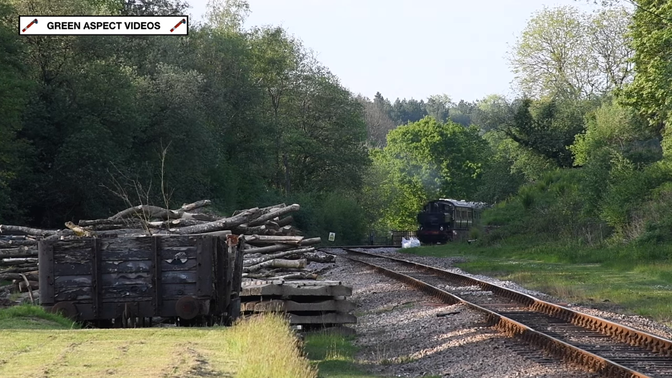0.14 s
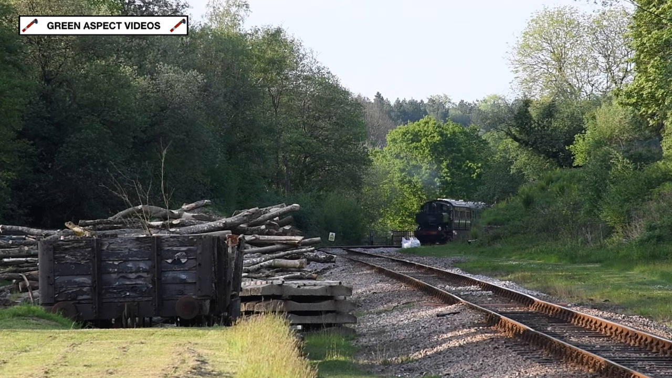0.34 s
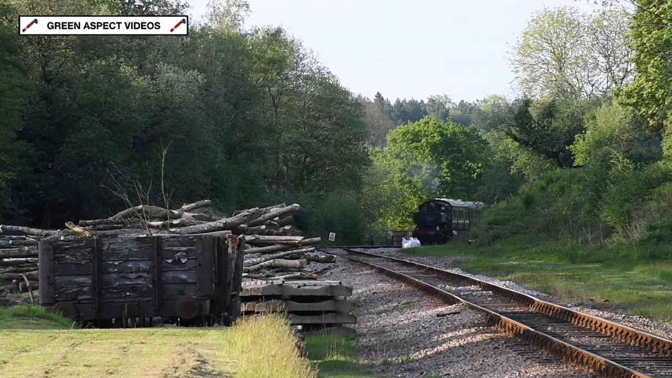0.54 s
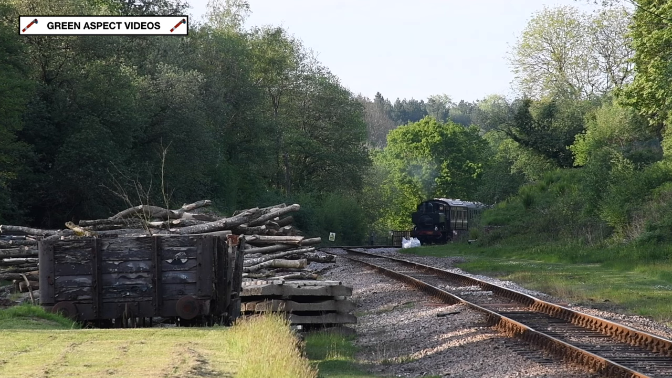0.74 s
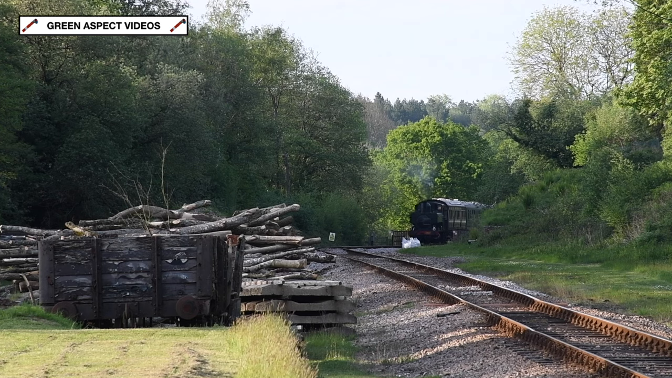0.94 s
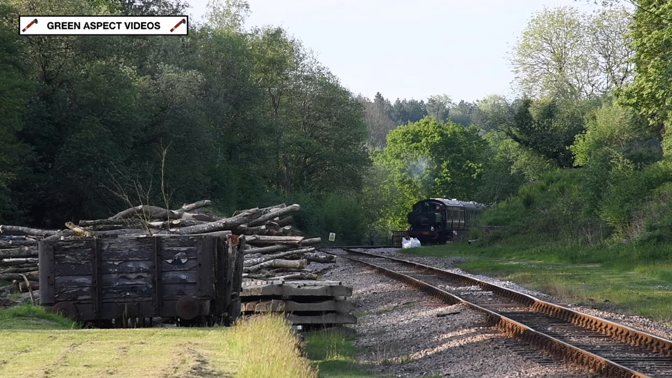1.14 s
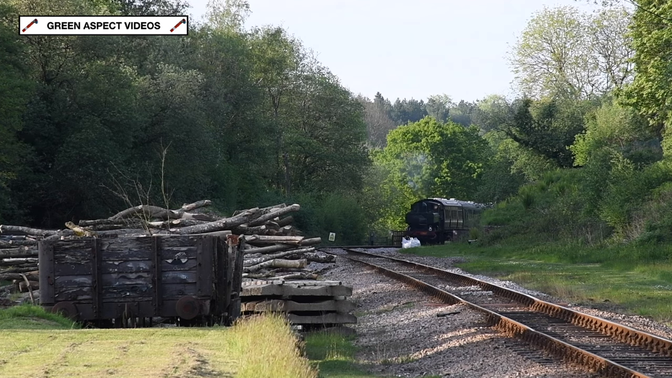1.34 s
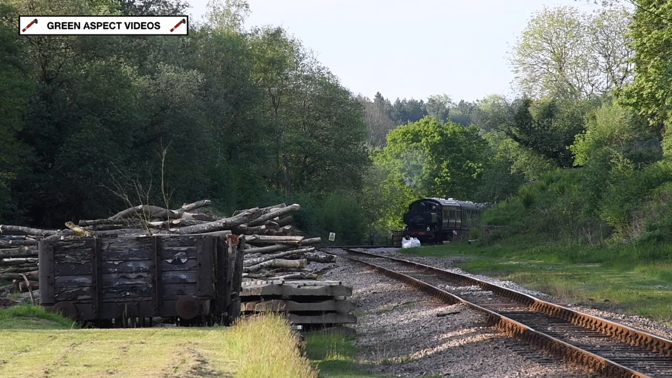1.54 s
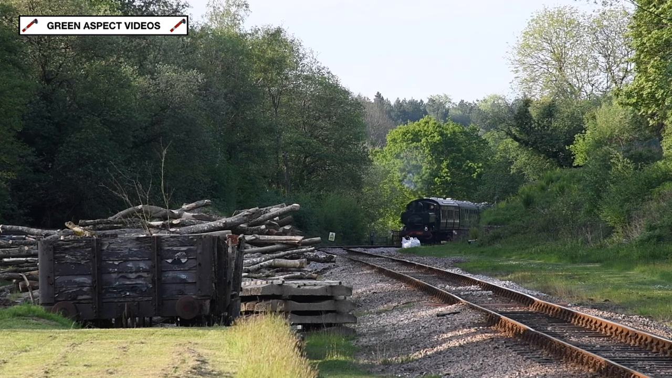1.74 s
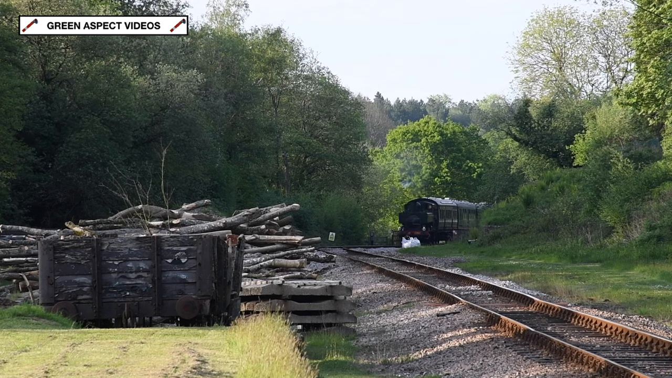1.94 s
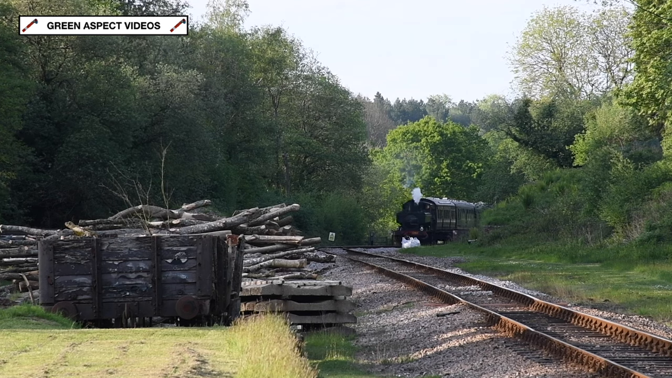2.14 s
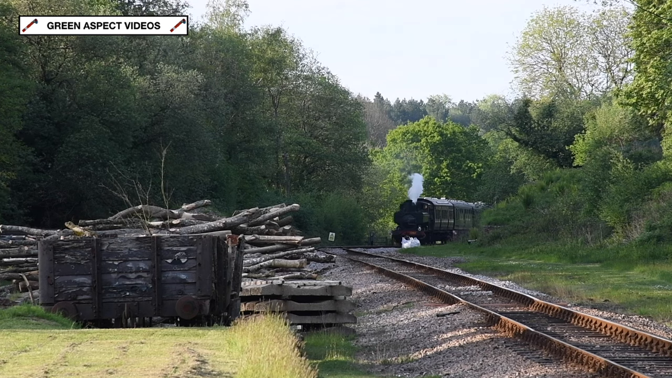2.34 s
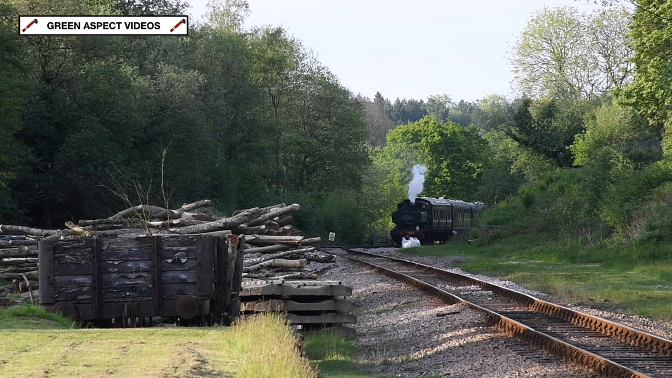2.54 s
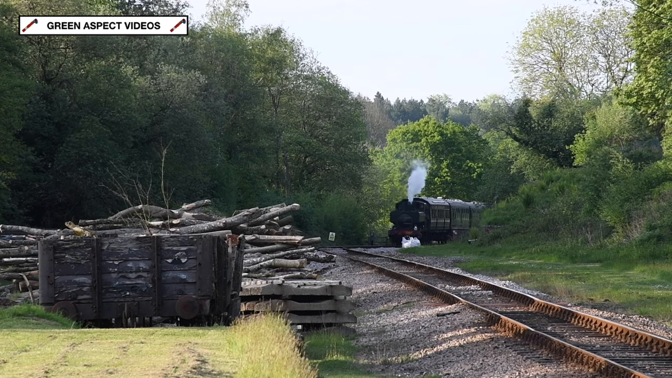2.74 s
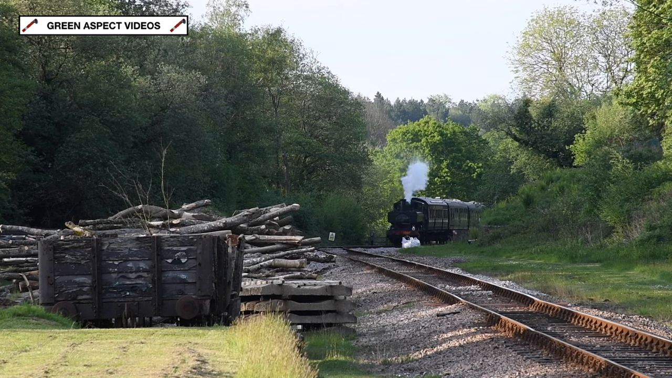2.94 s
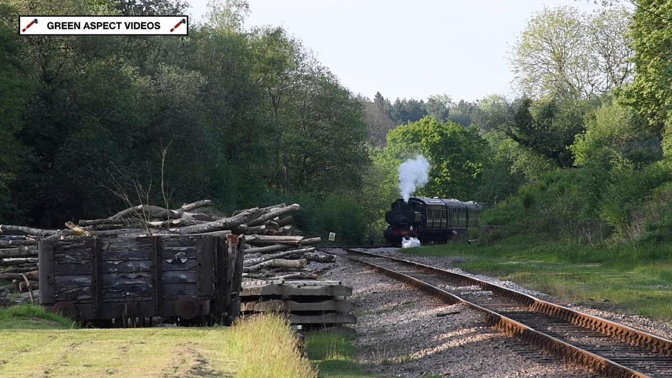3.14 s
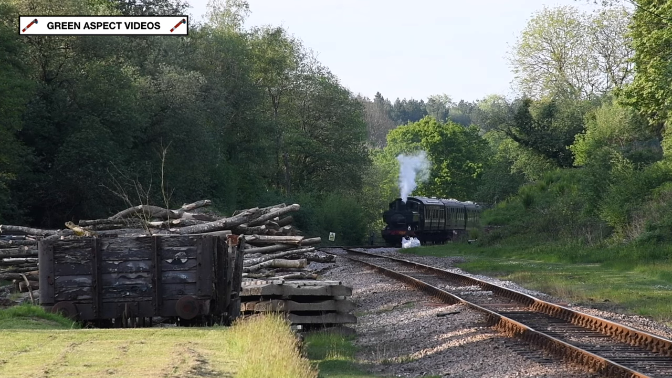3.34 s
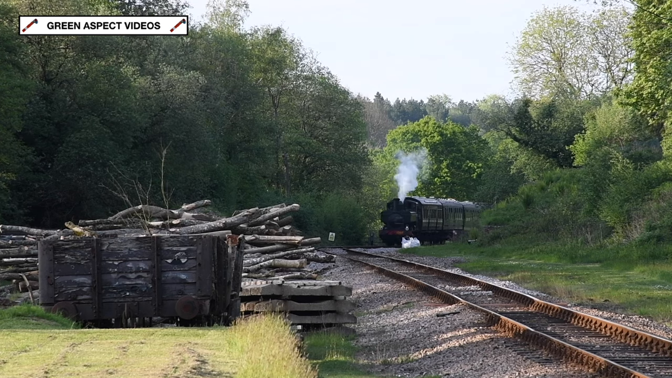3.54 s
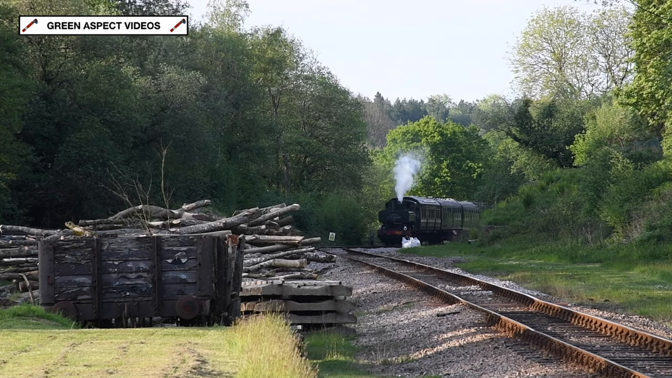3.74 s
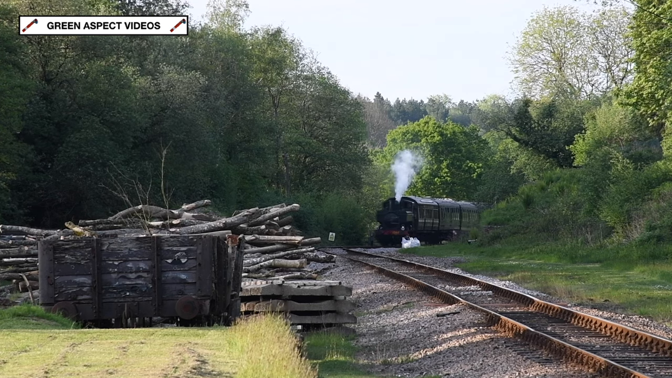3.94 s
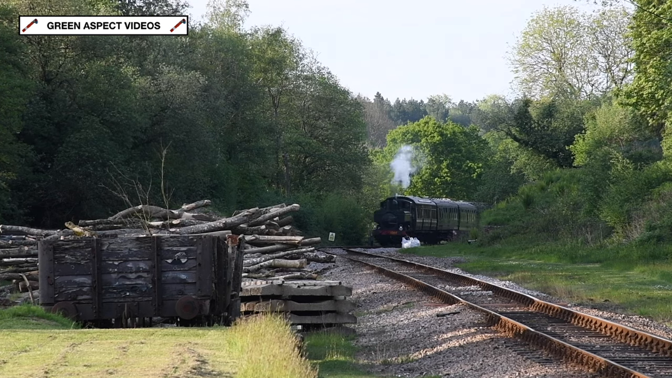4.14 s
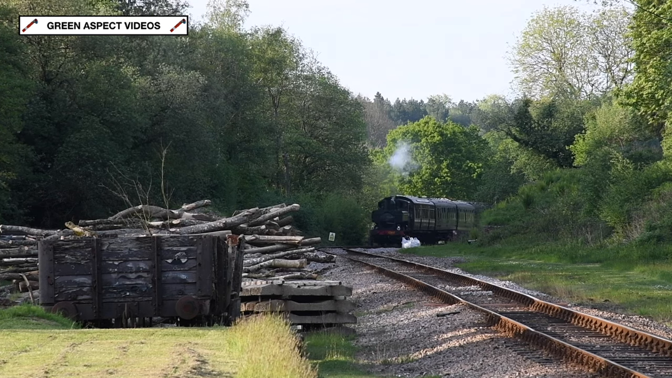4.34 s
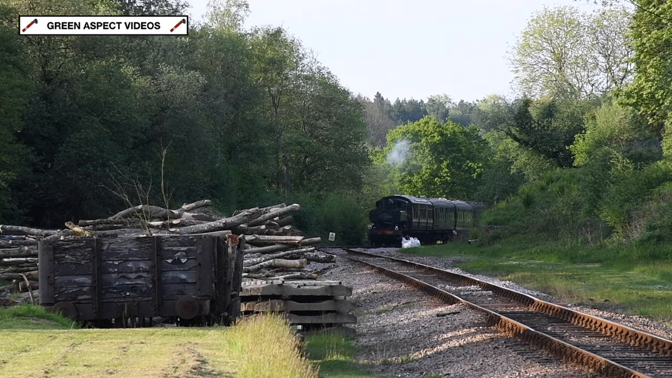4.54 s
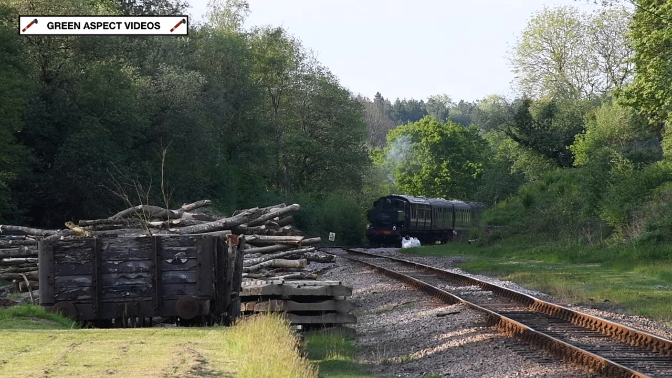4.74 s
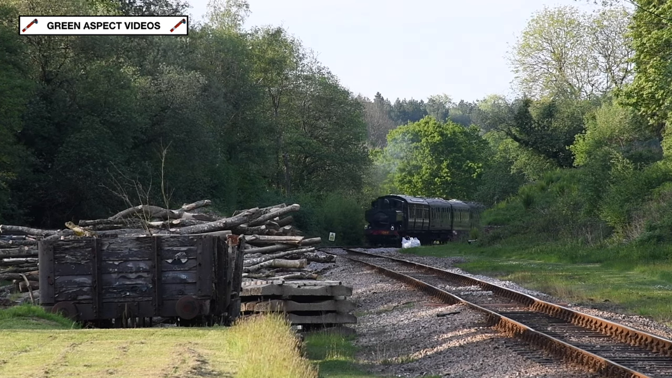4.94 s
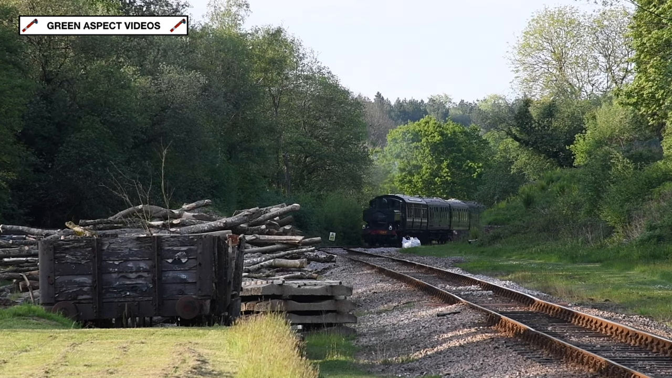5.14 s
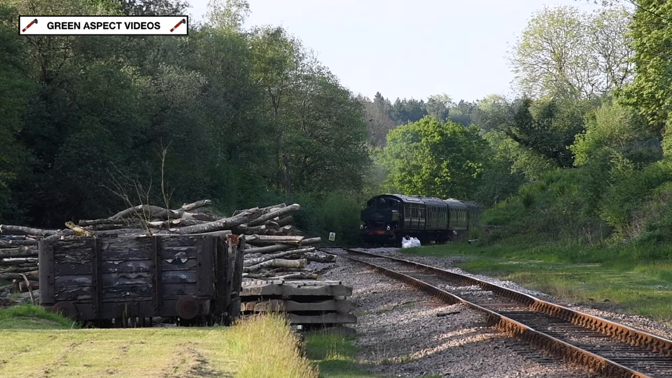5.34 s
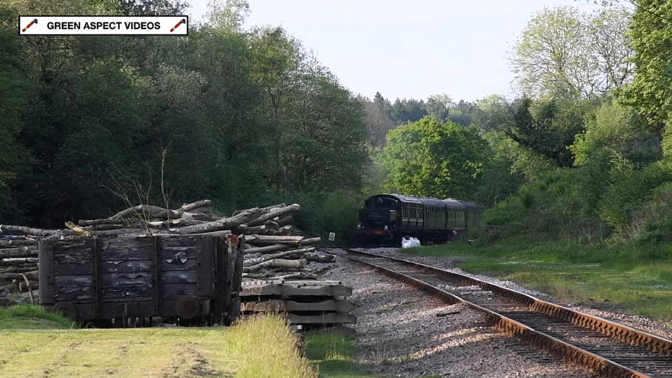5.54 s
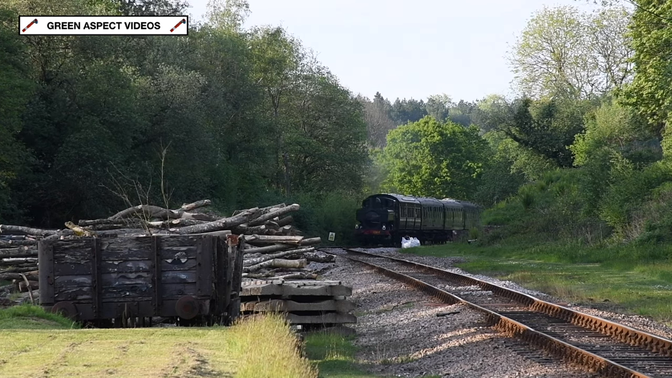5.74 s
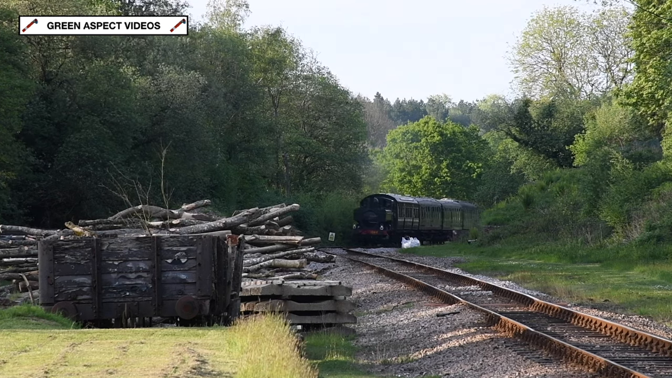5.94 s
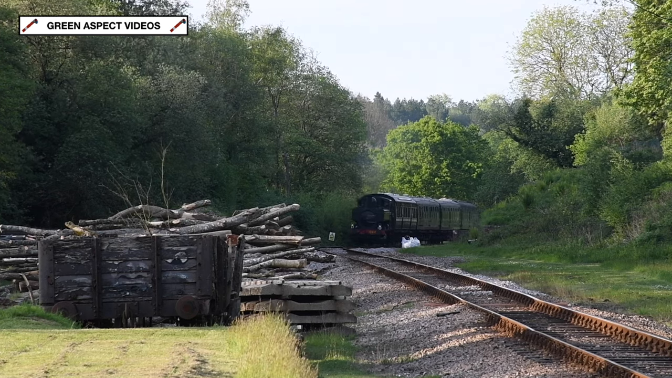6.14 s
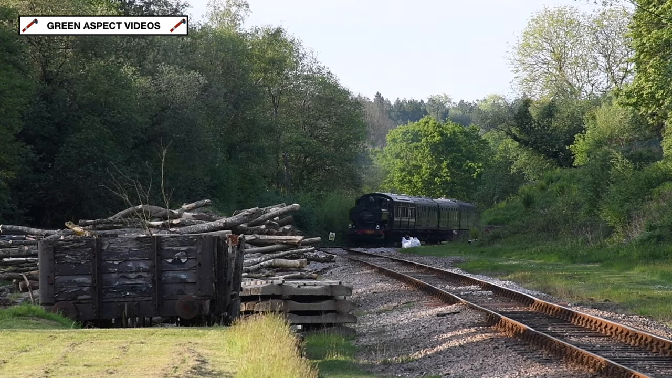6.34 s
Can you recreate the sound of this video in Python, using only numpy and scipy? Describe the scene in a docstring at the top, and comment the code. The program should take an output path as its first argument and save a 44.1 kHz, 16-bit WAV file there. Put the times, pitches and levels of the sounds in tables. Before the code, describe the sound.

Heard from far down the line, an approaching train makes a quiet, throbbing rumble beneath a few faint chirps and twitters. Then its steam whistle sounds once, much louder, for about two seconds: a hissing, fluttering tone that slides upward and jumps for a moment to a shrill pitch. After it stops, a long echo dies away among the trees, leaving the low rumble and a light rush from the rails.

```python
"""The low rumble of an approaching train and a few small birds fill a wooded cutting.
Then the distant steam locomotive gives one two-second blast on its whistle. A steam jet drives the bell:
the breathy note climbs as the bell heats and briefly overblows to its upper mode.
The woods throw it back in a long echo."""
import sys
import numpy as np
from scipy import signal
from scipy.fft import rfft, irfft, next_fast_len
from scipy.io import wavfile
from scipy.ndimage import map_coordinates

SR = 44100
rng = np.random.default_rng(int(sys.argv[2]) if len(sys.argv) > 2 else 0)


def output_pcm(signal):
    """Save a mono or channel-first signal as 16-bit PCM at the path in sys.argv[1].

    Samples are clipped to [-1, 1] before scaling.
    """
    pcm = np.clip(np.atleast_2d(signal).T, -1, 1) * 32767
    wavfile.write(sys.argv[1], SR, np.round(pcm).astype(np.int16))


N = 285961
TIME = np.arange(N) / SR

OPEN_S, SHUT_S = 2.957, 4.821   # the steam valve
COLD_HZ, HOT_HZ, HEAT_S = 797.7, 870.6, .41   # the note climbs as steam fills and heats the bell
# Tone colour of the train and the open air. Each row: frequency in Hz, relative level in dB.
AIR_SPECTRUM = [(15, -49.5), (25, -29.5), (52, -10), (75, 0.5), (188, -11.5), (368, -8.5), (410, -10.5),
                (509, -9), (648, -14.5), (970, -12), (1620, -16), (2420, -20), (3170, -25.5), (3720, -25),
                (15500, -43.5)]
# Surges of the train's noise. Each row: peak time in seconds, rumble gain in dB, wheel gain in dB.
TRAIN_SURGES = [(.2, -58, -63), (.41, -53, -69), (.59, -49, -49.5), (.85, -63, -54), (.95, -64, -53),
                (1.12, -59, -66), (1.245, -60, -58), (1.33, -52, -49), (1.53, -65, -52), (2.11, -48, -75),
                (2.45, -50, -58), (2.88, -61, -52), (5.271, -48.5, -70), (5.47, -48, -53)]


def from_db(db):
    """Decibels to gain."""
    return 10 ** (np.asarray(db) / 20)


def rms_one(x):
    """Scale to unit power."""
    return x / np.sqrt(np.mean(x ** 2) + 1e-20)


def in_time(points):
    """Read an envelope at every sample."""
    return np.interp(TIME, *np.transpose(points))


def at_hz(points, hz):
    """Read a spectrum on a log-frequency axis."""
    known, values = np.transpose(points)
    return np.interp(np.log(hz + 1), np.log(known), values)


def noise(gain_at, size=N):
    """Unit-power noise, coloured by the given function of frequency."""
    padded = next_fast_len(size)
    hz = np.fft.rfftfreq(padded, 1 / SR)
    spectrum = rfft(rng.standard_normal(padded)) * gain_at(hz)
    return rms_one(irfft(spectrum, padded)[:size])


def drift(rate_hz):
    """Random wandering of unit power, up to about the given rate."""
    return noise(lambda hz: 1 / (1 + (hz / rate_hz) ** 2))


def swells(rows):
    """Smooth bumps of gain. Each row: peak time in seconds, half length in seconds, peak in dB."""
    power = sum(from_db(db) ** 2 * np.exp(-2 * ((TIME - s) / half_s) ** 2) for s, half_s, db in rows)
    return np.sqrt(power + 1e-20)


def engine_rumble(level_db, throb_db, top_hz):
    """The engine's low rumble throbs and now and then surges."""
    rumble = noise(lambda hz: from_db(at_hz(AIR_SPECTRUM, hz)) / np.sqrt(1 + (hz / top_hz) ** 8))
    surges = swells([(s, .022, db) for s, db, _ in TRAIN_SURGES])
    return rumble * np.hypot(from_db(level_db + throb_db * drift(6)), surges)


def open_air(low_hz, top_hz):
    """A steady wash of distant train and open air, above the rumble."""
    def colour(hz):
        low_cut = np.sqrt(1 + (low_hz / (hz + 1)) ** 8)
        return from_db(at_hz(AIR_SPECTRUM, hz)) / low_cut / (1 + (hz / top_hz) ** 4)
    return noise(colour)


def wheels(air, gain_db, fade_db_per_s, uneven_db):
    """Dull wheel noise: surges over an uneven, fading bed."""
    dull = signal.sosfilt(signal.butter(2, 1200, fs=SR, output="sos"), air)
    bed = from_db(gain_db - fade_db_per_s * TIME + uneven_db * drift(18))
    return dull * (bed + swells([(s, .022, db) for s, _, db in TRAIN_SURGES]))


def birds():
    """Gliding sines: one bird's chirps run out into a soft twitter; a second flutes lower notes."""
    # The small bird. Each row: start in seconds, middle pitch in Hz, glide in Hz, level in dB.
    chirps = [(.147, 3900, 698.5, -60), (.338, 4550, 799, -58), (.425, 6420, 151.5, -64),
              (.697, 3400, 503, -58.5), (.792, 3970, 900, -55), (.857, 5490, 2.5, -61.5),
              (1.012, 3720, 596.5, -62), (1.06, 6100, -100, -63), (1.113, 5400, 286, -63)]
    # The second bird. Each row: start and length in seconds, middle pitch and glide in Hz, level in dB.
    fluted = [(.551, 0.22, 2430, -58.5, -61), (1.519, 0.11, 1900, -270, -59),
              (1.69, 0.11, 1975, -350, -53.5), (1.95, .081, 2110, 44, -59), (2.04, .1, 2400, 238, -56.5),
              (2.14, .14, 2527, 60.5, -62)]
    chirp_s, twitter_s, twitter_hz = .028, .022, 3460
    notes = [(s, chirp_s, hz, glide_hz, db) for s, hz, glide_hz, db in chirps]
    beats_s = np.arange(1.19, 1.8, .066)
    for s, (late, high, up, loud) in zip(beats_s, rng.standard_normal(size=(32, 4))):
        hz = twitter_hz + 180 * high
        notes.append((s + .011 * late, twitter_s, hz, 400 * np.sign(up), -61.5 + 2.2 * loud))
    song = np.zeros(N)
    for s, length_s, hz, glide_hz, db in notes + list(fluted):
        progress = np.linspace(0, 1, int(length_s * SR))
        phase = 2 * np.pi * np.cumsum(hz + glide_hz * (progress - .5)) / SR
        at = int(s * SR)
        song[at:at + len(phase)] += from_db(db) * np.sin(np.pi * progress) * np.sin(phase)
    return song


def woods(x):
    """Countless echoes off trunks and banks; the longer the path, the more treble it loses."""
    # Scattering by the trees. Each row: delay in seconds, relative level in dB.
    tail = [(.01, 1.5), (.08, 2), (.17, -1), (.32, -11.5), (.62, -14), (.85, -13.5), (1.18, -27.5),
            (1.5, -22), (2.2, -40), (3.5, -40)]
    # Colour the leaves give the echo. Each row: frequency in Hz, gain in dB.
    leaves = [(300, -6), (600, 6), (860, 1.5), (1700, -4.5), (2600, 1.5), (4200, -0.5), (7000, 3)]
    # Absorption along the path, as a tilt on the tail. Each row: frequency in Hz, gain in dB per second.
    absorption = [(300, -14), (860, 5), (1700, -1), (2600, -15), (3400, -24.5), (4200, -31), (7000, -37.5)]
    scatter = rms_one(rng.standard_normal(N) * from_db(in_time(tail)) * (TIME > .008)) / np.sqrt(N)
    edges_hz = np.geomspace(200, 10000, 11)
    response = np.zeros(N)
    for low, high in zip(edges_hz, edges_hz[1:]):
        band = signal.sosfilt(signal.butter(2, [low, high], "band", fs=SR, output="sos"), scatter)
        hz = np.sqrt(low * high)
        response += band * from_db(at_hz(leaves, hz) + at_hz(absorption, hz) * TIME)
    return signal.fftconvolve(x, response)[:N]


def settling(time_s):
    """Holds at 1 until the valve opens, then decays towards 0."""
    return np.exp(-np.maximum(TIME - OPEN_S, 0) / time_s)


def valve(rise_s, fall_s):
    """The valve swings open; once it shuts the pressure dies away."""
    return (1 - settling(rise_s)) ** 2 * np.exp(-np.maximum(TIME - SHUT_S, 0) / fall_s)


def heating(cold_hz, hot_hz):
    """A mode of the bell rises with its temperature."""
    return hot_hz + (cold_hz - hot_hz) * settling(HEAT_S)


def unsteady_phase(hz, jitter, rate_hz):
    """Phase of a tone whose pitch is shaken by turbulence."""
    return 2 * np.pi * np.cumsum(hz * (1 + jitter * drift(rate_hz))) / SR


def whistle_note(hz, flutter_db, fading_db, bloom_s):
    """The jet locks onto the bell's lowest mode: a fluttering tone whose overtones bloom with pressure."""
    # Strength of the note. Each row: time in seconds, relative level in dB.
    strength = [(2.97, -17.5), (3.15, -18.5), (3.3, -13.5), (3.39, -16.5), (3.46, -10.5), (3.6, -16),
                (3.81, -14), (3.88, -18), (4.02, -15), (4.1, -23), (4.18, -16), (4.27, -25.5),
                (4.36, -18.5), (4.64, -21), (4.76, -17.5), (4.84, -19)]
    # Its overtones. Each row: harmonic number, level in dB against the fundamental at full bloom.
    harmonics = [(2, -27.5), (3, -19), (4, -41.5), (5, -30)]
    phase = unsteady_phase(hz, jitter=.00801, rate_hz=63.3)
    overtones = sum(from_db(db) * np.sin(round(k) * phase) for k, db in harmonics)
    wave = np.sqrt(2) * (np.sin(phase) + overtones * valve(rise_s=bloom_s, fall_s=.05))
    fading = fading_db * np.tanh(drift(30))   # moving air on the long path
    gain = from_db(in_time(strength) + fading + flutter_db * drift(41))
    return wave * gain * valve(rise_s=.012, fall_s=.04)


def overblow(wander, flutter_db, octave_db, twelfth_db):
    """The upper mode is rough while weak; taking over, it steadies, goes flat and gains overtones."""
    # Swells of the upper mode. Each row: peak time and half length in seconds, relative peak in dB.
    squeals = [(3.026, 0.015, -27.5), (3.15, 0.037, -24), (3.21, 0.017, -21), (3.248, 0.022, -12),
               (3.32, 0.034, -25.5), (3.59, 0.03, -26.5), (3.9, .055, -24), (4.02, 0.039, -22.5),
               (4.24, 0.066, -27.5), (4.39, 0.065, -26), (4.825, 0.025, -22.5)]
    resting_db, takeover_db = -35.5, -18.5
    gain = np.hypot(from_db(resting_db), swells(squeals))
    drive = gain / from_db(takeover_db)
    locked = drive ** 2 / (1 + drive ** 2)   # how far this mode has captured the jet, 0-1
    scoop_hz = 259.86 * settling(.04)   # it starts flat while the pressure builds
    hz = heating(cold_hz=2573, hot_hz=2653) - scoop_hz
    sag = 1 - .05 * np.tanh(drive) ** 2
    phase = unsteady_phase(hz * wander * sag, jitter=.01 * (1 - .5 * locked), rate_hz=112.1)
    overtones = from_db(octave_db) * np.sin(2 * phase) + from_db(twelfth_db) * np.sin(3 * phase)
    wave = np.sqrt(2) * (np.sin(phase) + overtones * (1 + locked) / 2)
    flutter = flutter_db * (1.5 - locked) * drift(82)
    return wave * gain * from_db(.73 * locked + flutter) * valve(rise_s=.0091, fall_s=.035)


def steam(gain_db, gust_db, surge_db):
    """Jet noise rings the bell's resonances, which rise with the note as the bell heats."""
    # Resonances of the hot bell. Each row: centre in Hz, width in Hz, relative level in dB.
    bell = [(416, 11, -6.5), (747, 56, 2), (859.5, 79, 17), (1069, 150, -3), (1420, 140, -3.5),
            (1565, 91, 4.5), (1758, 130, 5), (2506, 270, -3.5), (3347, 74, 1.5), (3500, 78, 3),
            (4206, 170, 1), (5040, 240, -16), (5950, 450, -34.5)]
    # Broad rush of the jet. Each row: frequency in Hz, relative level in dB.
    rush = [(150, -58), (260, -37.5), (370, -16), (600, -10), (1100, -3.5), (2200, -9.5), (3000, -12.5),
            (4400, -14), (5500, -31), (7000, -35.5), (9000, -50), (14000, -69.5)]

    def colour(hz):
        peaks = sum(from_db(db) ** 2 / (1 + ((hz - centre) / width * 1.73) ** 2) ** 2
                    for centre, width, db in bell)
        return np.sqrt(peaks + from_db(at_hz(rush, hz) + .5) ** 2)
    speed = (heating(COLD_HZ, HOT_HZ) / HOT_HZ) ** .65   # the noise follows the climb part of the way
    breath = map_coordinates(noise(colour, size=N + SR), [np.cumsum(speed)], order=3)
    body = signal.sosfiltfilt(signal.butter(2, 3000, fs=SR, output="sos"), breath)
    # the treble needs full pressure, and flutters on its way through the moving air
    treble = (breath - body) * valve(rise_s=.062, fall_s=.32) * from_db(gust_db * drift(23))
    jet_db = gain_db - 2 * settling(.23) + surge_db * drift(10)
    return (body + treble) * from_db(jet_db) * valve(rise_s=.031, fall_s=.077)


def undertone(hz, level_db, flutter_db):
    """An unsteady tone that builds up slowly under the note."""
    wave = np.sqrt(2) * np.sin(unsteady_phase(hz, jitter=.01964, rate_hz=35.4))
    return wave * from_db(level_db + flutter_db * drift(18)) * valve(rise_s=.42, fall_s=.11)


def rails(level_db, from_s, full_s):
    """Midrange rail noise fades in as the train rounds the bend."""
    rush = noise(lambda hz: 1 / (1 + (500 / (hz + 1)) ** 4) / (1 + (hz / 1500) ** 2))
    return from_db(level_db) * np.interp(TIME, [from_s, full_s], [0, 1]) * rush


def far_bank(x, delay_s, spread_s):
    """One late, blurred echo from the far side of the cutting."""
    burst = rms_one(rng.standard_normal(N) * np.exp(-np.abs(TIME - delay_s) / spread_s)) / np.sqrt(N)
    dull_burst = signal.sosfilt(signal.butter(4, 3000, fs=SR, output="sos"), burst)
    return signal.fftconvolve(x, dull_burst)[:N]


def scene():
    """Everything lies far ahead, so both channels hear it alike."""
    wander = 1 + .006553 * drift(9.01)   # uneven steam pressure moves the pitch
    note_hz = heating(COLD_HZ, HOT_HZ) * wander
    crack = np.exp(-((TIME - 3.222) / .052) ** 4)   # note and breath duck as the loudest squeal sets in
    note = from_db(-1.5 - 12 * crack) * whistle_note(note_hz, flutter_db=1.5, fading_db=3, bloom_s=.31)
    upper = from_db(-3.5) * overblow(wander, flutter_db=3.5, octave_db=-28.5, twelfth_db=-51)
    lower = undertone(.883 * note_hz, level_db=-36, flutter_db=2.5)   # hoarse, a whole step down
    lower += undertone(.435 * note_hz, level_db=-59, flutter_db=2)   # faint and hollow
    breath = from_db(-6.5 * crack) * steam(gain_db=-27, gust_db=2, surge_db=1.57)
    song = birds()
    tone_send = from_db(-9.5) * note + from_db(-5.5) * upper + from_db(-3.5) * lower
    # the jet noise spreads in all directions, so more of it returns from the trees
    echo = woods(tone_send + from_db(-1) * breath + song)
    echo += from_db(-27) * far_bank(note + upper, delay_s=1.188, spread_s=.07)
    air = open_air(low_hz=160, top_hz=5000)
    train = wheels(air, gain_db=-68.5, fade_db_per_s=3, uneven_db=4.5)
    train += rails(level_db=-57.5, from_s=3, full_s=6)
    train += engine_rumble(level_db=-55, throb_db=1.2, top_hz=180)
    return np.tile(train + from_db(-52.5) * air + song + note + upper + breath + lower + echo, (2, 1))


def record(dry):
    """Each channel adds its own faint hiss; the top is cut."""
    # Colour of the hiss. Each row: frequency in Hz, relative level in dB.
    hiss_spectrum = [(25, -6.5), (70, -3), (150, 3.5), (300, 1), (600, -3), (1500, -15.5), (4000, -2),
                     (8000, -1), (15000, -1.5)]
    hiss = np.array([noise(lambda hz: from_db(at_hz(hiss_spectrum, hz))) for _ in dry])
    top_cut = signal.ellip(12, .1, 80, 15800, fs=SR, output="sos")
    return signal.sosfilt(top_cut, dry + from_db(-57) * hiss)


dry = scene()
out = record(dry)
output_pcm(out)
```